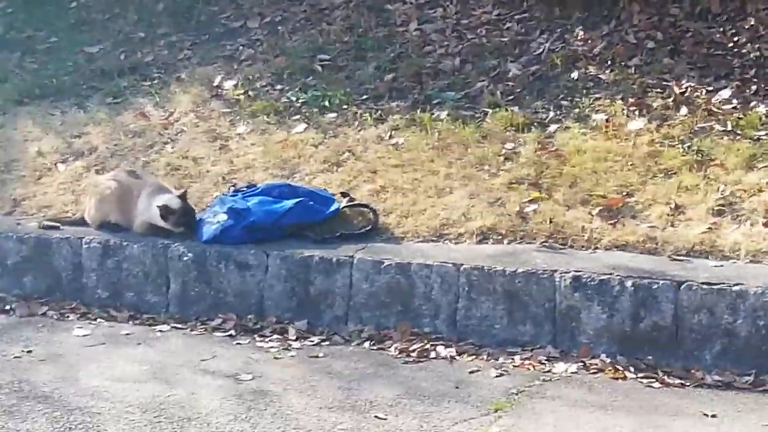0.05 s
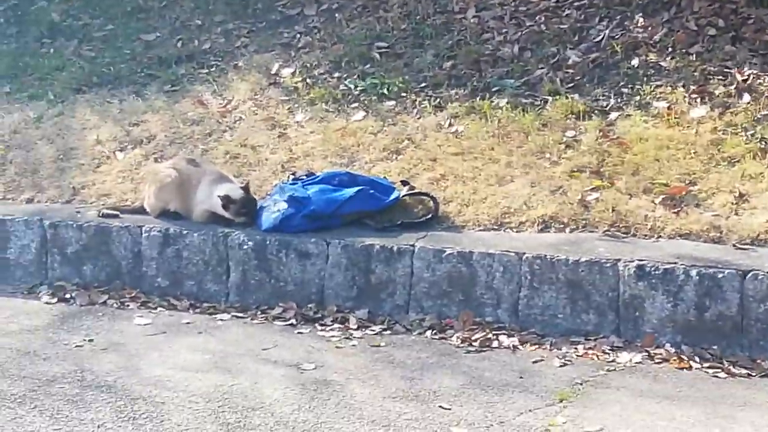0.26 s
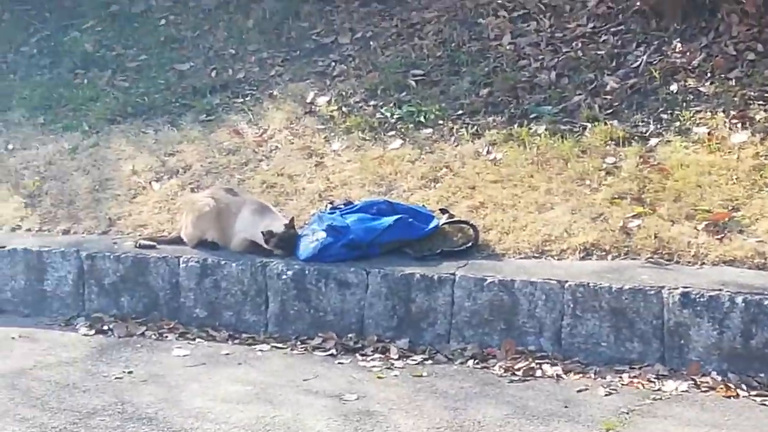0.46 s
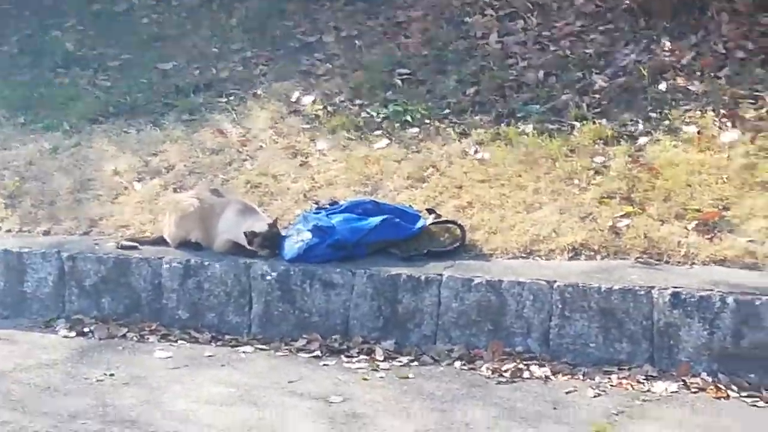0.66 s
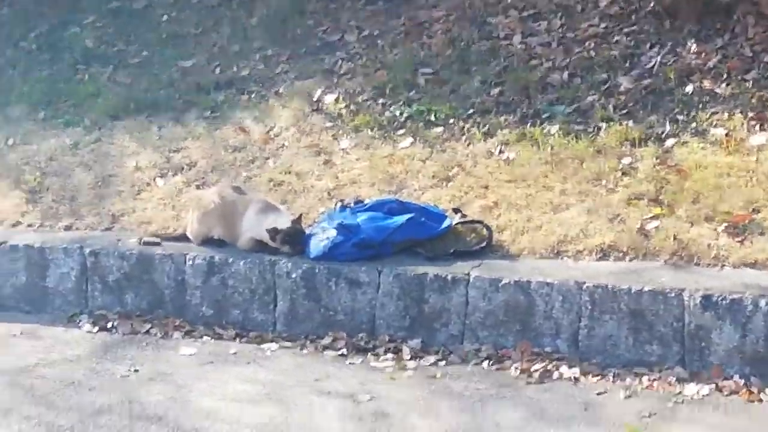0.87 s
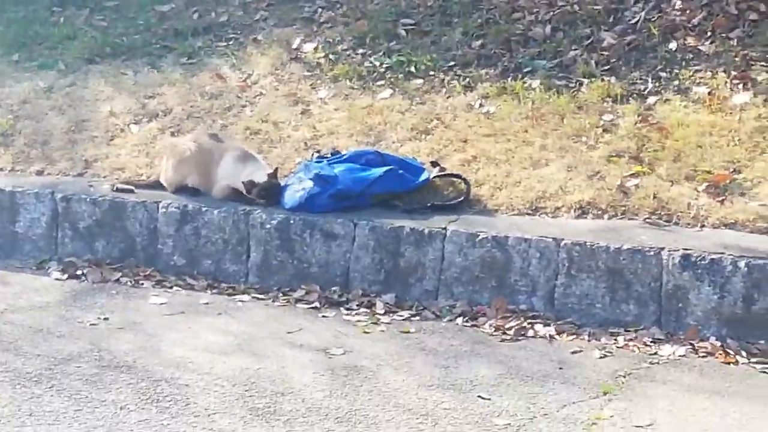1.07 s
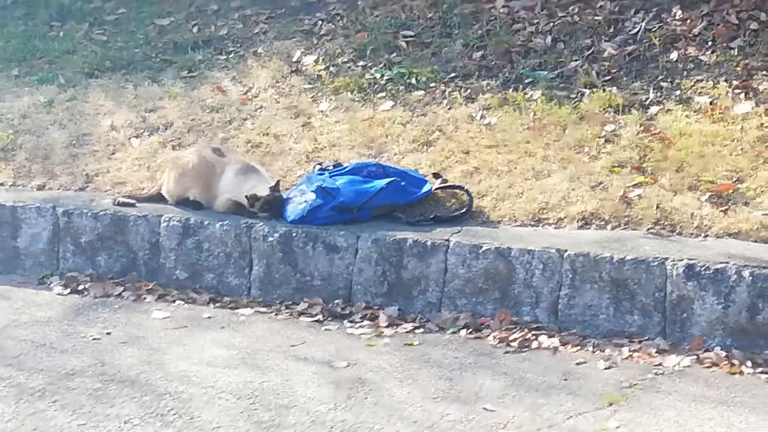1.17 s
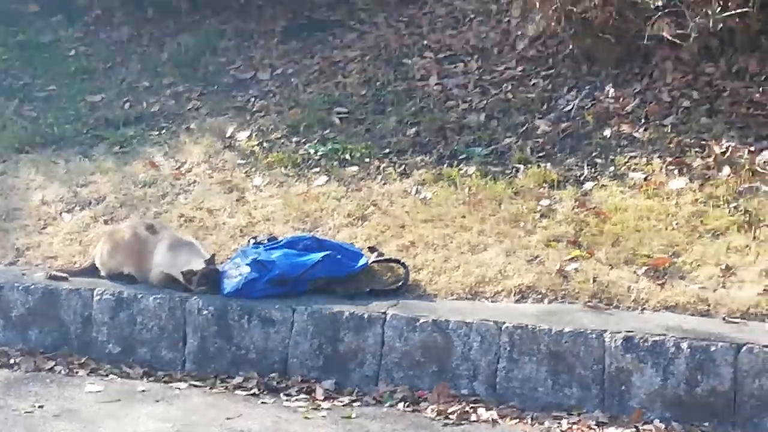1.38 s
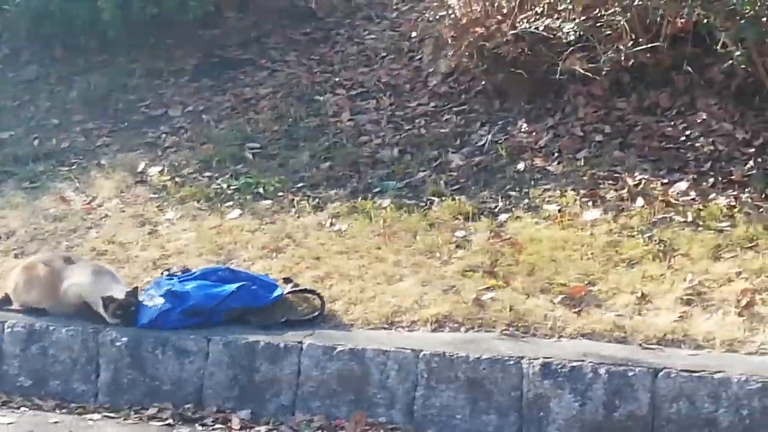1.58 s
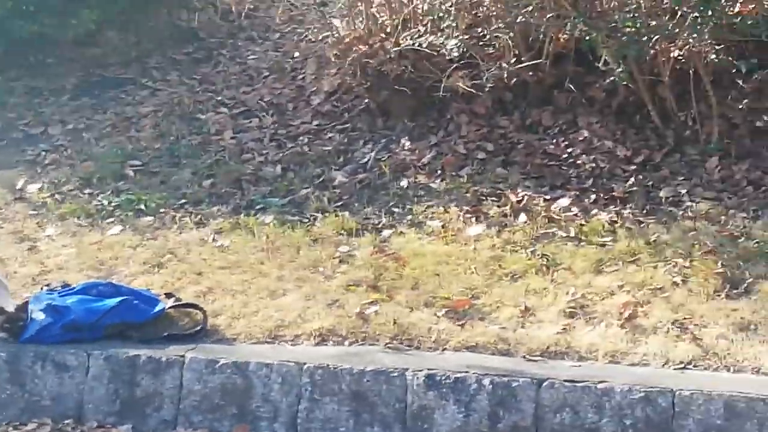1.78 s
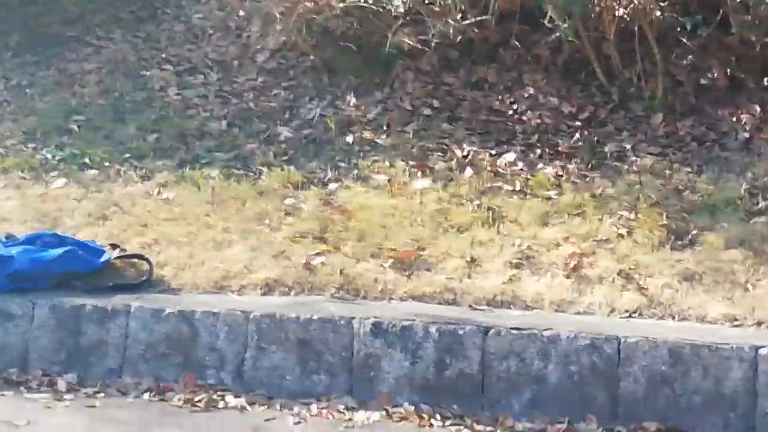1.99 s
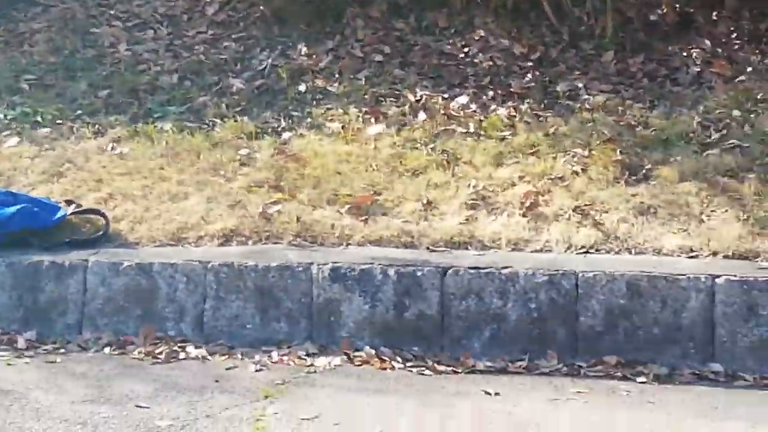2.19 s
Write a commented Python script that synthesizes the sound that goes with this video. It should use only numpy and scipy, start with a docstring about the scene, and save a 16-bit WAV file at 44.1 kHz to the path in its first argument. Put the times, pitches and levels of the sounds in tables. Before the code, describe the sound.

Dull puffs of wind or handling rumble shake a hand-held microphone in a quiet garden. Faint rustles and tiny ticks from a plastic bag or dry leaves come and go over a steady low drone and airy hiss.

```python
"""A quiet garden, heard from a hand-held camera. Dull bursts of rumble, from the grip or from
puffs of air, shake both microphone ports. Tiny ticks, brushing rustles and stray crackles come
and go, with faint swells of tone, perhaps a far bird. Behind them lie a steady low drone and an
airy outdoor hiss. Each is shaped noise or filtered random impulses."""
import sys
import numpy as np
from scipy import signal
from scipy.fft import rfft, irfft, next_fast_len
from scipy.io import wavfile
from scipy.ndimage import uniform_filter1d

SR = 44100
rng = np.random.default_rng(int(sys.argv[2]) if len(sys.argv) > 2 else 0)


def wav_record(signal):
    """Record a signal, one row per channel, as 16-bit PCM in the file named by sys.argv[1]."""
    frames = np.transpose(np.atleast_2d(signal))
    bounded = np.clip(frames, -1, 1)
    # unit amplitude maps onto the largest positive 16-bit level
    quanta = np.round(bounded * 32767).astype(np.int16)
    wavfile.write(sys.argv[1], SR, quanta)


N = 99225
TIME_S = np.arange(N) / SR

# bursts: t/s, length/s, body/dB, depths/dB, edge/dB
RUMBLE_BURSTS = [(0.208, 0.011, -51, -34.5, -75), (0.285, 0.093, -39.5, -35.5, -53.5),
                 (0.404, 0.044, -44.5, -38, -62), (0.462, 0.037, -30, -39, -42),
                 (0.516, 0.068, -44, -34.5, -80), (0.6, 0.0059, -26.5, -33.5, -44.5),
                 (0.649, 0.047, -44, -36.5, -89), (0.731, 0.079, -37.5, -49.5, -60.5),
                 (0.903, 0.055, -32, -40, -47.5), (0.974, 0.025, -36.5, -31, -50),
                 (1.002, 0.041, -29, -46, -38), (1.041, 0.023, -28, -54, -52),
                 (1.103, 0.055, -30, -41, -52.5), (1.179, 0.076, -31, -44, -46.5),
                 (1.285, 0.027, -36, -44, -72), (1.327, 0.018, -28.5, -60, -49),
                 (1.432, 0.017, -28.5, -31, -31), (1.457, 0.054, -28.5, -33.5, -42),
                 (1.517, 0.044, -60, -32.5, -70), (1.58, 0.055, -48.5, -43.5, -67),
                 (1.688, 0.1, -44, -37, -77)]
# spectra of the three parts: f/Hz, level/dB
BODY_SPECTRUM = [(40, -32), (85, -2.5), (125, 2.5), (165, -1), (210, -3.5), (270, -17), (400, -41),
                 (700, -86)]
DEPTHS_SPECTRUM = [(15, -5), (36, 3), (80, 5), (110, 3.5), (170, -13), (400, -47)]
EDGE_SPECTRUM = [(130, -36), (230, -1.5), (300, -4), (400, -9), (500, -17.5), (700, -33), (1400, -65)]


def rumble(attack_s=0.0094, release_s=0.009):
    """The grip or puffs of air shake the ports: bursts of low noise in three parts."""
    power = np.zeros((3, N))
    for start_s, length_s, *levels_db in RUMBLE_BURSTS:
        rise = np.clip((TIME_S - start_s) / attack_s + .5, 0, 1)
        fall = np.exp(-np.maximum(TIME_S - start_s - length_s, 0) / release_s)
        power += (amp(levels_db)[:, None] * rise * fall) ** 2
    spectra = BODY_SPECTRUM, DEPTHS_SPECTRUM, EDGE_SPECTRUM
    parts = np.array([low_noise(spectrum, evenness=0.85) for spectrum in spectra])
    return (np.sqrt(power) * parts).sum(axis=0)


# phase between ports: f/Hz, left lead/rad
PORT_LEAD = [(45, 0.082), (130, 0.7), (260, 1.33), (400, 1.94), (600, 2.7)]
# balance: f/Hz, L-R/dB
PORT_PAN = [(40, 0.5), (130, -0.7), (250, -1), (450, -4)]


def ports(shake):
    """Both ports shake alike, the left a little earlier."""
    lead = lambda hz: np.exp(np.array([[.5j], [-.5j]]) * along(PORT_LEAD, hz))
    return filtered(shake, lambda hz: sides(along(PORT_PAN, hz)) * lead(hz))


# snaps: t/s, level/dB, decay/s, f/Hz, width/oct, L-R/dB
TICK_EVENTS = [(.3462, -35, 0.0036, 9900, .13, 4), (0.7786, -37, 0.0005, 13500, .35, -5),
               (0.8657, -32, 0.0005, 9600, .42, -4), (1.3787, -37.5, 0.0004, 10200, .2, 0)]


def ticks(rise_per_decay=0.093):
    """Tiny dry snaps: bright bursts that die at once; longer ones start more softly."""
    out = np.zeros((2, N))
    for start_s, level_db, decay_s, centre_hz, width_oct, pan_db in TICK_EVENTS:
        band = lambda hz: 1 / (1 + (np.log2((hz + 1) / centre_hz) / width_oct) ** 2)
        burst = unit(filtered(rng.standard_normal((2, N)), band))
        age_s = np.maximum(TIME_S - start_s, 0)
        envelope = np.minimum(age_s / (rise_per_decay * decay_s), 1) * np.exp(-age_s / decay_s)
        out += amp(level_db) * sides(pan_db) * envelope * burst
    return out


# strokes: peak t/s, rise/s, fall/s, level/dB, L-R/dB, top treble lift/dB
RUSTLE_STROKES = [(.356, .015, 0.021, -49.5, 1, -4), (.447, 0.037, 0.031, -51.5, 0.5, 5.5),
                  (.61, 0.058, 0.027, -52, -2, 3), (.74, 0.069, 0.083, -55, 1, -1),
                  (1.07, 0.03, .025, -56, -7, 5), (1.168, 0.044, 0.042, -51.5, -5.5, 5)]
# rustle and crackle spectra, left and right: f/Hz, level/dB
RUSTLE_SPECTRUM_L = [(1200, -28), (3000, -9), (9500, 1), (10500, 4.5), (12000, -11), (15500, -18)]
RUSTLE_SPECTRUM_R = [(1200, -29), (3000, -12), (7000, -2.5), (9800, -1.5), (11100, 4.5), (12200, -6.5),
                     (15500, -17)]


def rustles(grains_per_s=1100, spread_db=8, grain_db=-1.5, crisp_above_hz=12000):
    """Soft brushing strokes: fine hiss with tiny crackles in it, some crisper than others."""
    power, top_power = np.zeros((2, 2, N))
    for peak_s, rise_s, fall_s, level_db, pan_db, lift_db in RUSTLE_STROKES:
        width_s = np.where(TIME_S < peak_s, rise_s, fall_s)
        stroke = amp(level_db) * sides(pan_db) * gaussian(TIME_S, peak_s, width_s)
        power += stroke ** 2
        top_power += (amp(lift_db) * stroke) ** 2
    hits = rng.random((2, N)) < grains_per_s / SR
    grains = hits * amp(spread_db * rng.standard_normal((2, N)))
    left, right = rng.standard_normal((2, N)) + amp(grain_db) * unit(grains)
    hiss = np.array([coloured(left, RUSTLE_SPECTRUM_L), coloured(right, RUSTLE_SPECTRUM_R)])
    top = filtered(hiss, lambda hz: 1 - 1 / (1 + (hz / crisp_above_hz) ** 20))
    return np.sqrt(power) * (hiss - top) + np.sqrt(top_power) * top


def stray_crackles(rate_per_s=9, rms_db=-68):
    """Dry leaves or plastic settling: sparse, faint impulses at random moments."""
    left, right = (rng.random(N) < rate_per_s / SR) * rng.random((2, N))
    crackles = np.array([coloured(left, RUSTLE_SPECTRUM_L), coloured(right, RUSTLE_SPECTRUM_R)])
    return amp(rms_db) * crackles


# swells: peak t/s, half-length/s, f/Hz, level/dB, L-R/dB
CALL_SWELLS = [(0.096, 0.062, 1130, -60, -4), (0.935, 0.065, 1190, -59.5, -6.5),
               (1.792, 0.14, 1074, -62.5, 0)]


def far_calls(width_hz=100):
    """Perhaps a far bird: swells of narrow-band noise, barely above the hiss."""
    out = np.zeros((2, N))
    for peak_s, half_s, pitch_hz, level_db, pan_db in CALL_SWELLS:
        tone = unit(filtered(rng.standard_normal((2, N)), lambda hz: gaussian(hz, pitch_hz, width_hz)))
        out += amp(level_db) * sides(pan_db) * gaussian(TIME_S, peak_s, half_s) * tone
    return out


# spectrum: f/Hz, level/dB
DRONE_SPECTRUM = [(30, -14), (45, -1), (65, 1), (92, 1.5), (125, -7.5), (165, -8), (210, -15.5),
                  (300, -19.5), (450, -32), (900, -56)]
# envelope: t/s, level/dB
DRONE_ENVELOPE = [(0, -47), (.25, -45), (1.65, -42.5), (2.25, -45.5)]


def drone():
    """Steady low noise, drifting a little in level."""
    return amp(curves(DRONE_ENVELOPE)[0]) * low_noise(DRONE_SPECTRUM, evenness=0.22)


# hiss spectra, left and right: f/Hz, level/dB
AIR_SPECTRUM_L = [(150, -17), (400, -3), (650, -3), (1100, -1.5), (1400, -5), (1850, 2.5), (3400, -0.5),
                  (4400, -2.5), (5100, -6), (5800, -3.5), (7300, -8), (8500, -3.5), (9750, -0.6),
                  (11500, -15.5), (15500, -25)]
AIR_SPECTRUM_R = [(150, -4), (400, -9), (650, -5), (1400, -5.5), (1950, -2), (2350, 6), (2720, 2.5),
                  (3150, -7), (3600, -6.5), (4250, -7), (5000, -9), (5800, -7), (7200, -12.5), (11000, -15),
                  (12000, -23), (15500, -27)]
# envelope: t/s, left level/dB, right level/dB
AIR_ENVELOPE = [(0, -49.5, -46.5), (.8, -49.5, -47), (1.4, -51.5, -49), (2.25, -54, -50)]
# likeness at the ports: f/Hz, coherence
AIR_COHERENCE = [(400, 0.44), (1000, 0.49), (1500, 0.054), (2100, 0.29), (3200, 0.37), (5500, 0.2),
                 (8000, 0.055)]


def air(left_lag_s=0.0007225):
    """Distant outdoor hiss, part from the right, part from all around; each port colours it."""
    share = lambda hz: along(AIR_COHERENCE, hz)
    lag = lambda hz: np.exp(np.array([[-1j], [1j]]) * np.pi * hz * left_lag_s)
    direct = filtered(rng.standard_normal(N), lambda hz: np.sqrt(share(hz)) * lag(hz))
    diffuse = filtered(rng.standard_normal((2, N)), lambda hz: np.sqrt(1 - share(hz)))
    left, right = direct + diffuse
    hiss = np.array([coloured(left, AIR_SPECTRUM_L), coloured(right, AIR_SPECTRUM_R)])
    return amp(curves(AIR_ENVELOPE)) * hiss


def patchy(x, depth_db):
    """x with patches of random gain in time and frequency."""
    spectra = signal.stft(x, nperseg=1024)[2]
    field = uniform_filter1d(rng.standard_normal(spectra.shape[1:]), size=6, axis=0)
    field = uniform_filter1d(field, size=9, axis=1)
    return signal.istft(spectra * amp(depth_db * unit(field)))[1][:, :N]


def low_noise(spectrum, evenness):
    """Low noise of rms 1, its chance swells partly evened out."""
    noise = coloured(rng.standard_normal(N), spectrum)
    power = np.abs(uniform_filter1d(np.abs(signal.hilbert(noise)) ** 2, size=700)) + 1e-3
    evened = noise / power ** (evenness / 2)
    cutoff_hz = spectrum[-1][0]
    return unit(filtered(evened, lambda hz: 1 / (1 + (hz / cutoff_hz) ** 8)))


def coloured(x, spectrum):
    """x shaped by (Hz, dB) points, at rms 1."""
    return unit(filtered(x, lambda hz: amp(along(spectrum, hz))))


def filtered(x, response):
    """x through a complex frequency response."""
    size = next_fast_len(N + 8192)
    return irfft(rfft(x, size) * response(np.fft.rfftfreq(size, 1 / SR)), size)[..., :N]


def along(points, hz):
    """Interpolate (Hz, value) points on a log axis."""
    points_hz, values = np.transpose(points)
    return np.interp(np.log(hz + 1), np.log(points_hz + 1), values)


def curves(rows):
    """One value per sample for each column after the time."""
    times_s, *columns = np.transpose(rows)
    return np.array([np.interp(TIME_S, times_s, column) for column in columns])


def gaussian(x, centre, width):
    """Bell curve of height 1."""
    return np.exp(-.5 * ((x - centre) / width) ** 2)


def sides(pan_db):
    """Left and right gains for a level difference."""
    return amp(np.array([[.5], [-.5]]) * pan_db)


def amp(db):
    """Decibels to gain."""
    return 10 ** (np.asarray(db) / 20)


def unit(x):
    """Scale to rms 1."""
    return x / np.sqrt(np.mean(x ** 2) + 1e-20)


def scene():
    """All layers at the two ports."""
    lows = ports(rumble() + drone())
    hiss = patchy(air(), depth_db=1.16)
    return lows + hiss + far_calls() + rustles() + ticks() + stray_crackles()


def record(dry):
    """The camera keeps nothing above its band limit."""
    return filtered(dry, lambda hz: hz < 15850)


dry = scene()
out = record(dry)
wav_record(out)
```